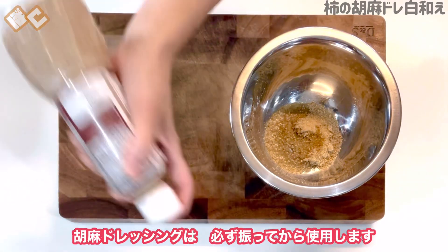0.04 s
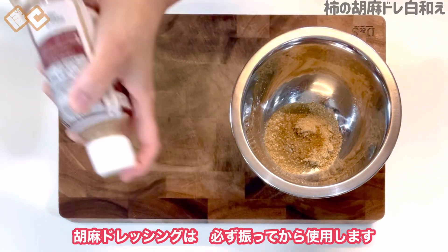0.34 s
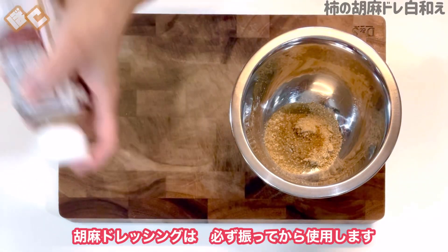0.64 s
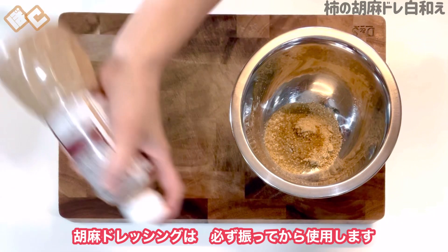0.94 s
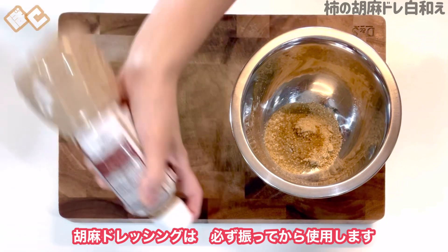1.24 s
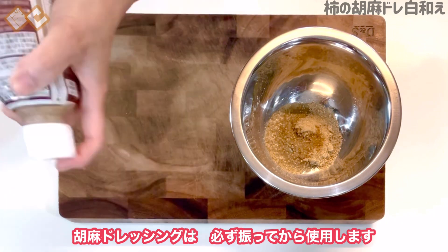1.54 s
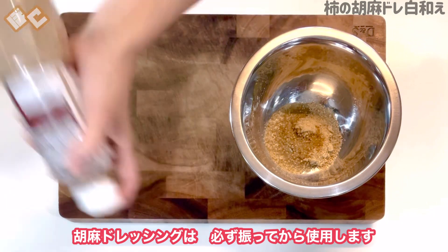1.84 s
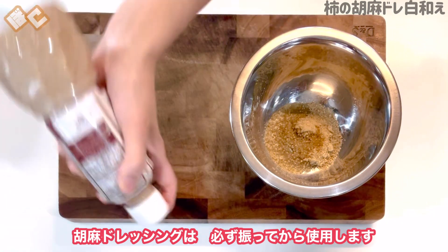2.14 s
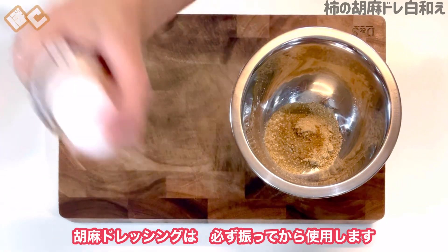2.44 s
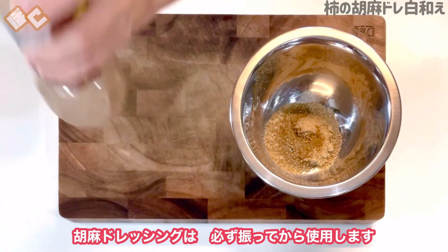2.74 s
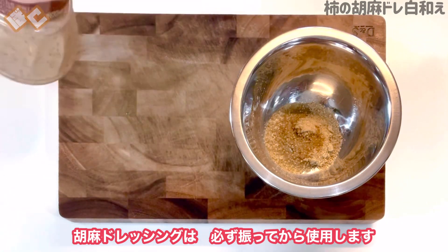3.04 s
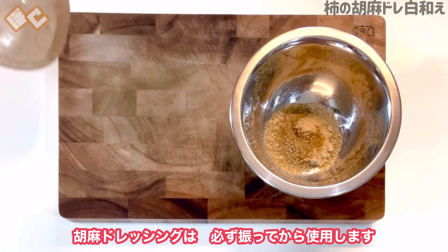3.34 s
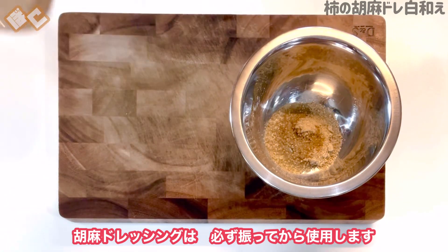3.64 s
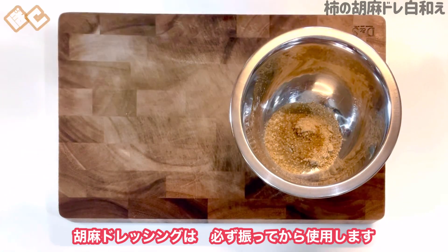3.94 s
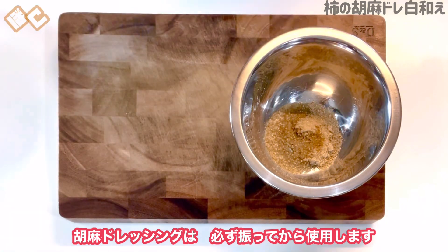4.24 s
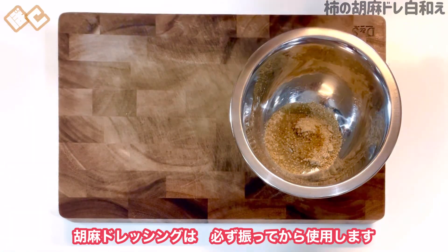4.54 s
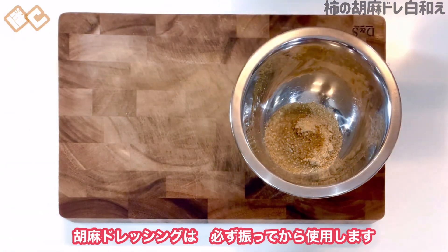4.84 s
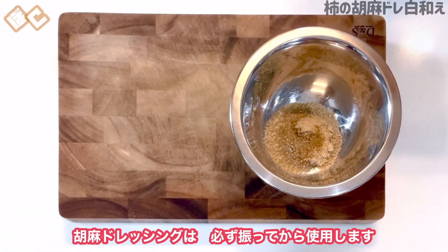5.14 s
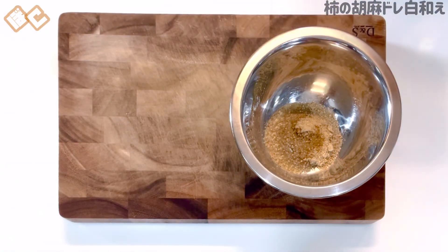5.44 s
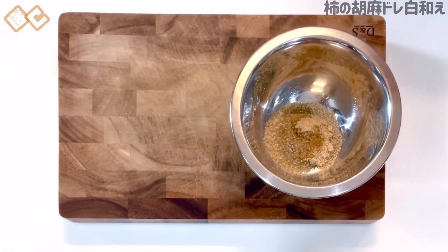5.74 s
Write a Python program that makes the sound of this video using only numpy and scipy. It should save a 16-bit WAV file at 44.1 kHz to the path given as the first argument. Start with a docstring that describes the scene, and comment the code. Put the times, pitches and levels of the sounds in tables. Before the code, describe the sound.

In a small kitchen, thick liquid sloshes quickly back and forth inside a plastic bottle, with close, hollow glugs, wet splatters and little plastic crackles. After nearly four seconds the shaking ends. The bottle knocks down on the counter, further from the microphone, and the cap opens with a sharp click. Faint finger rubs and tiny taps follow over a low appliance hum.

```python
"""A plastic bottle of thick dressing, shaken by hand over a kitchen counter, close to a stereo pair.
At about four strokes a second, air pockets gulp through the liquid, small bubbles pop, each slosh
throws spray against the wall, and the thin plastic snaps under the grip. Further off the microphones,
the bottle is set down and its cap snaps open. An appliance hums behind it all in the small room."""
import sys
import numpy as np
from scipy import signal
from scipy.fft import rfft, next_fast_len
from scipy.io import wavfile
from scipy.ndimage import uniform_filter1d

SR = 44100
rng = np.random.default_rng(int(sys.argv[2]) if len(sys.argv) > 2 else 0)


def to_wav(s):
    """Save 16-bit WAV."""
    ch = np.atleast_2d(s).T  # columns
    pcm = np.round(np.clip(ch, -1, 1) * 32767)  # PCM
    wavfile.write(sys.argv[1], SR, pcm.astype(np.int16))


N = 263718
TIME = np.arange(N) / SR

# Event levels are ahead of mix, room and microphones; spectra give shape only.
# Air pockets gulping through the liquid: start_s, level_db, pitch_hz, ring_cycles
GULPS = [(0.022, -37.5, 194, 16), (.1665, -14.5, 750, 13), (.170, -17, 217.5, 16.3), (0.283, -29, 331, 23),
         (.417, -27.5, 234, 12), (.506, -24, 734, 10.5), (0.632, -39.5, 560, 24), (.7144, -28.5, 694, 18),
         (.746, -13.5, 1003, 15.5), (.748, -33.5, 302, 18), (.868, -18.5, 950, 3.3), (.975, -34, 209, 22),
         (.988, -28.5, 540, 50), (1.14, -21, 280, 10), (1.1444, -16, 209, 14.6), (1.304, -26.5, 230, 13),
         (1.315, -24, 590, 5.7), (1.356, -30, 190, 15), (1.446, -23.5, 530, 6.3), (1.545, -26.5, 210, 9),
         (1.587, -16.5, 739, 20), (1.5916, -24, 202, 16.5), (1.69, -27.5, 196, 18.5),
         (1.784, -23, 178.6, 16), (1.805, -22.5, 229, 20), (1.8184, -17, 192, 15), (1.819, -24.5, 522, 14),
         (1.823, -31.5, 125, 14), (1.991, -29.5, 660, 6.3), (2.025, -34, 558, 60), (2.03, -23, 175, 8.3),
         (2.091, -33.5, 630, 12), (2.131, -29.5, 533, 13), (2.233, -26.5, 710, 5.7),
         (2.281, -30.5, 886, 55), (2.2816, -22.5, 193, 12), (2.31, -29.5, 1140, 13),
         (2.369, -33.5, 353, 37), (2.595, -25, 289, 15.6), (2.655, -27.5, 227, 12), (2.665, -24, 326, 24),
         (2.674, -29, 760, 42), (2.704, -26, 191, 5.9), (2.711, -36.5, 115, 21), (2.853, -19, 695, 1.7),
         (2.86, -35.5, 240, 43), (2.921, -29, 199, 16), (2.935, -32.5, 134, 19), (2.939, -18, 199, 5.3),
         (2.941, -29.5, 689, 37), (3.203, -29, 723, 25), (3.208, -31, 172, 14), (3.211, -38, 114, 16),
         (3.375, -28, 183, 11.3), (3.408, -38.5, 666, 14), (3.457, -27, 207.6, 33),
         (3.613, -37.5, 560, 6.6), (3.668, -36, 530, 13)]
# Small bubbles bursting at the wall: start_s, level_db, pitch_hz, splash_offset_db
POPS = [(0.0448, -30.5, 3770, 6), (.105, -39, 3290, 1), (.19, -41, 2640, 6.5), (0.245, -26, 1535, -0.5),
        (.267, -35, 2890, -3), (0.3332, -37, 1500, -16), (0.4121, -33, 1370, 2), (0.5041, -26, 3454, 5.5),
        (0.606, -41, 2100, 7.5), (0.746, -23, 2727, 5.5), (0.8663, -28.5, 1430, 10),
        (0.882, -36, 1220, -21), (0.969, -33, 1370, -23), (1.0005, -25, 1510, -22),
        (1.1374, -35, 1840, 12.5), (1.2127, -31.5, 2800, 8), (1.2223, -34, 4130, 8.5),
        (1.245, -35.5, 2510, 7.5), (1.3458, -24, 3410, 5), (1.352, -25, 3000, 1.5),
        (1.4248, -33.5, 3660, 10), (1.4477, -38, 2340, 18), (1.4628, -38.5, 1890, 10),
        (1.542, -40.5, 2260, 14.5), (1.6756, -30, 1750, 12.5), (1.6887, -28, 3660, -22),
        (1.8111, -28.5, 1220, -7), (1.8196, -31.5, 2000, 11), (1.892, -23.5, 3100, -6),
        (2.0272, -24.5, 1670, 11.5), (2.0671, -29, 2980, -12), (2.1581, -36.5, 1480, 9),
        (2.1824, -32, 2860, 7), (2.3678, -25.5, 3850, 1.5), (2.3919, -32, 4360, 8),
        (2.7048, -38, 1990, 15.5), (2.8603, -20.5, 4410, -1.5), (2.93, -28, 1375, 6.5),
        (2.9391, -23, 4890, -4.5), (2.9522, -25.5, 2850, -1.5), (3.0581, -44, 1480, 17.5),
        (3.1792, -31, 3220, 3.5), (3.201, -27.5, 1380, -1.5), (3.372, -27, 3720, -20),
        (3.4658, -28.5, 1830, 1), (3.4918, -28, 1780, 4.5), (3.5221, -30.5, 4820, 1.5),
        (3.672, -42, 1410, -3), (3.754, -31, 1245, 9)]
# Liquid landing at one end of the bottle: crest_s, level_db, drain_s
SLOSHES = [(0.024, -45, 0.043), (0.276, -32.5, 0.011), (0.364, -42, 0.0078), (0.51, -37.5, .009),
           (0.646, -48.5, 0.042), (0.746, -40.5, 0.017), (0.873, -37.5, 0.016), (0.992, -32, 0.022),
           (1.12, -41.5, 0.038), (1.225, -35.5, .022), (1.353, -40.5, 0.033), (1.459, -36.5, 0.025),
           (1.597, -43, 0.026), (1.686, -33, 0.018), (1.791, -35.5, 0.032), (1.816, -27.5, 0.0075),
           (1.885, -43.5, 0.049), (2.029, -37, .016), (2.278, -38.5, 0.041), (2.37, -34.5, 0.0057),
           (2.698, -30.5, 0.015), (2.858, -38.5, 0.01), (2.933, -44, 0.051), (3.07, -47.5, 0.06),
           (3.205, -34.5, 0.018), (3.373, -37.5, 0.013), (3.453, -42.5, .018), (3.486, -30.5, 0.015),
           (3.676, -47, 0.027), (3.769, -49.5, 0.047)]
# Spectrum of fine bubbles and ticks: frequency_hz, level_db
FINE_SPECTRUM = [(400, -2.5), (900, 3), (1600, 3), (3000, 5), (5000, 1.5), (7000, -1.5), (11000, -9.5),
                 (13000, -23.5), (16000, -24.5)]
# Spectrum of coarse bubbles: frequency_hz, level_db
COARSE_SPECTRUM = [(60, -13.5), (130, -1.5), (250, 7.5), (450, -7.5), (800, -1.5), (1400, -15.5),
                   (3000, -46)]
# Spectrum of stirring foam: frequency_hz, level_db
FOAM_SPECTRUM = [(350, -4), (600, -17), (1500, -5.5), (3000, -3), (5000, -14.5), (7000, -6), (12000, -26.5)]
# Spectrum of droplets on the wall: frequency_hz, level_db
SPATTER_SPECTRUM = [(500, -15.5), (1500, -4.5), (4500, -5), (7000, 4.5), (11000, -2.5), (13000, -10.5),
                    (16000, -12)]

# The thin wall snapping under the grip: start_s, level_db, t60_s
WALL_SNAPS = [(0.164, -38, 0.017), (0.6463, -35.5, 0.011), (0.7414, -34.5, 0.014), (0.8654, -43.5, 0.0083),
              (1.0222, -40.5, 0.0081), (1.2118, -35, 0.0094), (1.3445, -47.5, 0.011), (1.6768, -30, 0.0084),
              (1.8906, -36, 0.0049), (2.0278, -34, 0.014), (2.103, -47, 0.014), (2.1833, -41, 0.0078),
              (2.354, -44, 0.017), (2.5704, -40, 0.011), (2.7817, -25, 0.0069), (2.918, -42.5, 0.015),
              (3.0809, -29.5, 0.017), (3.3535, -39, 0.012), (3.5227, -32.5, 0.014), (3.682, -41.5, 0.0087)]
# Spectrum of the flexing wall: frequency_hz, level_db
SNAP_SPECTRUM = [(500, -22), (2000, -10.5), (4500, -2.5), (7000, 8.5), (9500, -6.5), (12000, -11),
                 (13500, -9), (16000, -16)]
# The bottle landing and its cap opening: start_s, crack_db, crack_t60_s, body_db
KNOCKS = [(4.2538, -38, 0.019, -33.5), (4.2572, -64, 0.036, -44), (4.269, -51, .037, -43.5),
          (4.507, -47, 0.014, -85), (4.553, -52, .073, -72), (4.9356, -27, 0.018, -65),
          (4.943, -33.5, 0.0097, -57), (4.952, -40, 0.1, -71), (5.061, -76.5, .05, -57.5)]
# Modes of the full bottle standing on the counter: pitch_hz, level_db, t60_s
BOTTLE_MODES = [(342, -17, 0.038), (438.5, -2.5, 0.13), (478, -2.5, 0.036), (706, -16, 0.014),
                (995, -4.5, 0.026), (1820, 4.5, 0.016), (2060, -10.5, 0.022), (2320, 4.5, 0.025),
                (3700, -3, 0.028), (5340, 2, 0.0096)]
# Spectrum of struck plastic: frequency_hz, level_db
CRACK_SPECTRUM = [(200, -34), (900, -25), (1600, 0.5), (3500, -1), (5500, -2.5), (8000, 1.5), (11000, 7),
                  (13000, -0.5), (16000, 3.5)]
# Spectrum of the counter's thud: frequency_hz, level_db
THUD_SPECTRUM = [(120, -26), (300, -27), (450, 2), (800, -2), (1300, -7.5), (2300, -12), (6000, -4),
                 (16000, -66)]
# Small things touching the counter: start_s, level_db, pitch_hz, t60_s
TAPS = [(5.058, -54, 1890, 0.043), (5.577, -54.5, 2400, 0.045), (5.619, -47.5, 338, 0.056)]
# Fingers sliding on the plastic: crest_s, level_db, width_s
RUBS = [(3.894, -66.5, 0.063), (4.119, -72, 0.037), (4.541, -66, 0.011), (4.609, -72, 0.19),
        (4.856, -65.5, 0.034), (5.04, -62, 0.062), (5.439, -75.5, 0.038), (5.62, -73.5, .05),
        (5.808, -72.5, 0.023)]
# Spectrum of rubbing skin: frequency_hz, level_db
SKIN_SPECTRUM = [(300, 13), (900, -2), (1700, -1), (3800, -4), (5500, -5.5), (8000, -10), (11000, 0),
                 (13000, -11), (16000, -31.5)]

# Tones of the appliance: pitch_hz, level_db
HUM_TONES = [(44.4, -59), (70, -71.5), (133.6, -59), (265, -75), (357, -81.5), (399, -77.5), (445, -75.5)]
# Spectrum of the kitchen's still air: frequency_hz, level_db
AIR_SPECTRUM = [(15, -34), (30, -33), (42, 5.5), (55, -1.5), (95, -8), (135, -11), (210, -18.5),
                (280, -16.5), (440, -29.5), (700, -31.5), (1000, -43), (3000, -51), (7000, -52),
                (16000, -47)]
# Hum and air grow a little louder near the end: time_s, gain_db
BACKGROUND_SWELL = [(0, 0), (3.9, 0), (4.6, -0.5), (4.9, 1.5), (5.3, 3.5), (5.98, 3)]
# Reflections off small surfaces nearby, with little bass: frequency_hz, level_db
NEAR_SPECTRUM = [(60, -16.5), (200, -17), (450, 9.5), (1500, 1), (4500, -1.5), (7000, -3), (16000, -11)]
# Decay of the kitchen: frequency_hz, t60_s
KITCHEN_T60 = [(150, 0.36), (400, 0.47), (1000, 0.36), (2800, 0.3), (7300, 0.23), (15000, 0.037)]
# Phase between the microphones: frequency_hz, left_lead_rad
MIC_PHASE = [(20, 0), (1000, .05), (1600, -.2), (5200, -.1), (6200, 2.9), (7200, 3.2), (8300, 4),
             (9900, 6.2), (11300, 6.4), (12900, 9.3), (16000, 9.6)]
# Balance between the microphones: frequency_hz, left_minus_right_db
MIC_BALANCE = [(60, 3.5), (200, 2.5), (700, 0), (2400, 0), (4400, -5), (8000, -2), (15000, 1.5)]

SHED_S = 0.018  # time over which a gulp sheds bubbles


def gulps(steady_hz=282, steady_cycles=5.4, max_rise_octaves=0.79):
    """Big air pockets, damped by the thick liquid: deep ones sink in pitch, small long ones rise."""
    out = np.zeros(N)
    for start, db, hz, cycles in GULPS:
        glide_by_size = 1.3 * np.log2(hz / steady_hz)
        glide_by_length = 0.014 * (cycles - steady_cycles)
        glide = min(glide_by_size, glide_by_length, max_rise_octaves)
        add(out, start, amp(db) * bubble(hz, cycles / hz, glide, attack_cycles=0.64))
    return out


def pops(splash_t60=0.029, splash_rise_s=0.0002, tick_t60=0.0063):
    """A small bubble bursts with a tick and rings; its torn film splashes in a band round that pitch."""
    out, t = np.zeros(N), np.arange(2048) / SR
    for start, db, hz, splash_db in POPS:
        splash_noise, tick_noise = rng.standard_normal((2, len(t)))
        band = [(hz / 8, -17), (hz / 1.5, -6), (hz, 0), (hz * 1.4, -6), (hz * 2.6, -19), (hz * 9, -35)]
        splash = unit(colour(splash_noise, band) * clumps(len(t), depth_db=4, clump_s=0.0012))
        splash *= fade(t, splash_t60) * (1 - np.exp(-t / splash_rise_s))
        tick = colour(tick_noise, FINE_SPECTRUM) * fade(t, tick_t60)
        ring_t60 = 0.013 * np.sqrt(2000 / hz)  # smaller bubbles die sooner
        add(out, start, amp(db) * bubble(hz, ring_t60, glide_octaves=0.21, attack_cycles=2.5))
        add(out, start, amp(db) * (amp(splash_db - 5) * splash + amp(-12) * tick))
    return out


def spray(rise_share=0.41, ticks_per_s=2500):
    """Each slosh swells and drains as a cloud of fine and coarse bubbles; foam keeps stirring between."""
    slosh_power = sum(swell(crest, db, rise_share * drain, drain) for crest, db, drain in SLOSHES)
    shed_power = sum(swell(start + SHED_S / 2, db - 22, rise_share * SHED_S, SHED_S)
                     for start, db, _, _ in GULPS)
    foam_power = foam_settling()
    bunches = clumps(N, depth_db=5, clump_s=0.002)
    bubbles = cloud(700, 6000, per_s=1300, cycles=18, spread_db=4.5)
    ticks = rng.standard_normal(N) * (rng.random(N) < ticks_per_s / SR)
    fine = colour(bubbles + 0.5 * unit(ticks * bunches), FINE_SPECTRUM)
    coarse = colour(cloud(110, 1300, per_s=800, cycles=10, spread_db=2.5), COARSE_SPECTRUM)
    foam = colour(cloud(420, 7000, per_s=900, cycles=26, spread_db=4), FOAM_SPECTRUM)
    # Lone bubbles rising through the foam, middle-sized and small.
    gurgles = cloud(510, 1600, per_s=100, cycles=20, spread_db=2, sizes=14)
    plips = cloud(1200, 4500, per_s=110, cycles=32, spread_db=3, sizes=16)
    thrown = amp(-3) * fine + amp(-10) * (gurgles + plips) + amp(-12.5) * spatter()
    froth = amp(-7) * foam + amp(-6) * gurgles + amp(-5.5) * plips
    coarse_power = amp(-3) ** 2 * slosh_power + shed_power + amp(-7) ** 2 * foam_power
    return np.sqrt(slosh_power) * thrown + np.sqrt(foam_power) * froth + np.sqrt(coarse_power) * coarse


def spatter(per_s=330, spread_db=2):
    """Single droplets tick crisply on the thin wall; a few hit harder than the rest."""
    strength = rng.choice([-1, 1], N) * amp(spread_db * np.minimum(rng.exponential(1, N), 3))
    return colour(strength * (rng.random(N) < per_s / SR), SPATTER_SPECTRUM)


def foam_settling(foam_t60=0.27, film_drain_s=0.18):
    """Power of the foam left by sloshes and gulps, and of the thin film draining down the wall."""
    settle_s = foam_t60 / np.log(1000)
    slosh_foam = sum(swell(crest, db - 15, drain, settle_s) for crest, db, drain in SLOSHES)
    film = sum(swell(crest, db - 25, drain, film_drain_s) for crest, db, drain in SLOSHES)
    gulp_foam = sum(swell(start, db - 31, SHED_S, settle_s) for start, db, _, _ in GULPS)
    return slosh_foam + film + gulp_foam


def bubble(hz, t60, glide_octaves, attack_cycles):
    """A ringing pocket of air; its pitch slides as the liquid squeezes it."""
    t = np.arange(int(1.3 * max(t60, 1e-3) * SR)) / SR
    turns = np.cumsum(hz * 2 ** (glide_octaves * np.minimum(t / t60, 1))) / SR
    envelope = (1 - np.exp(-t * hz / attack_cycles)) * fade(t, t60)
    return np.sin(2 * np.pi * turns) * envelope / envelope.max()


def cloud(low_hz, high_hz, per_s, cycles, spread_db, sizes=36):
    """Bubbles of many sizes ringing at random times, a few stronger than the rest; rms 1."""
    out = np.zeros(N)
    for hz in np.geomspace(low_hz, high_hz, sizes):
        t60 = cycles * rng.uniform(0.5, 1.5) / hz
        ring = bubble(hz, t60, glide_octaves=rng.uniform(-0.3, 0.4), attack_cycles=0.6)
        strength = amp(spread_db * np.minimum(rng.exponential(1, N), 3))
        births = rng.random(N) < per_s / sizes / SR
        out += signal.oaconvolve(strength * births, ring / np.linalg.norm(ring))[:N]
    return unit(out)


def clumps(samples, depth_db, clump_s):
    """A gain that jumps about, because drops land in little bunches."""
    knots = np.cumsum(rng.exponential(clump_s, int(2 * samples / SR / clump_s) + 8))
    jumps = np.clip(rng.standard_normal(len(knots)), -2, 2)
    return unit(amp(depth_db * np.interp(np.arange(samples) / SR, knots, jumps)))


def wall_snaps():
    """Dry ticks of the bottle wall flexing under the grip."""
    out, t = np.zeros(N), np.arange(1024) / SR
    for start, db, t60 in WALL_SNAPS:
        add(out, start, amp(db + 4) * colour(rng.standard_normal(len(t)), SNAP_SPECTRUM) * fade(t, t60))
    return out


def knocks(blur=0.6, thud_t60=0.028):
    """Plastic cracks, the counter thuds and the bottle rings, its modes blurred by the liquid inside."""
    out, t = np.zeros(N), np.arange(SR // 4) / SR
    for start, crack_db, crack_t60, body_db in KNOCKS:
        crack = colour(rng.standard_normal(len(t)), CRACK_SPECTRUM) * fade(t, crack_t60)
        thud = colour(rng.standard_normal(len(t)), THUD_SPECTRUM) * fade(t, thud_t60)
        body = amp(-3) * thud
        for hz, db, t60 in BOTTLE_MODES:
            drift = blur * np.sqrt(hz / SR) * np.cumsum(rng.standard_normal(len(t)))
            body += amp(db) * np.sin(2 * np.pi * hz * t + drift) * fade(t, t60)
        add(out, start, amp(crack_db) * crack + amp(body_db - 6) * body)
    return out


def counter_taps():
    """Small things touch the counter, each ringing briefly at one pitch."""
    out, t = np.zeros(N), np.arange(SR // 4) / SR
    for start, db, hz, t60 in TAPS:
        add(out, start, amp(db) * np.sin(2 * np.pi * hz * t) * fade(t, t60))
    return out


def finger_rubs(uneven_db=3):
    """Skin sticks and slips on the plastic in short swells of uneven hiss."""
    grip = amp(uneven_db * unit(uniform_filter1d(rng.standard_normal(N), size=300)))
    slides = sum(amp(db) * np.exp(-0.5 * ((TIME - crest) / width) ** 2) for crest, db, width in RUBS)
    return slides * unit(grip * colour(rng.standard_normal(N), SKIN_SPECTRUM))


def appliance_hum(waver_rad=0.23):
    """A low hum in the background, each tone wavering on its own."""
    out, knots = np.zeros(N), np.linspace(0, TIME[-1], 40)
    for hz, db in HUM_TONES:
        waver = waver_rad * np.interp(TIME, knots, rng.standard_normal(len(knots)))
        out += amp(db) * np.sqrt(2) * np.sin(2 * np.pi * hz * TIME + waver)
    return out


def kitchen_air():
    """Room tone: a faint rumble, mostly the same at both microphones."""
    shared, left, right = (colour(noise, AIR_SPECTRUM) for noise in rng.standard_normal((3, N)))
    return amp(-58) * (shared + amp(-9) * np.array([left, right]))


def near_reflections(t, t60=0.037, alike_below_hz=300):
    """Quick, sparse echoes off counter and bowl; long waves reach both microphones alike."""
    noise = rng.standard_normal((2, len(t)))
    arrivals = noise * (abs(noise) > 1.6) * (t > 0.002)
    near = np.array([colour(side, NEAR_SPECTRUM) for side in arrivals]) * fade(t, t60)
    lowpass = signal.butter(2, alike_below_hz, fs=SR, output="sos")
    near -= signal.sosfiltfilt(lowpass, near - near.mean(0))
    return near / np.linalg.norm(near[0])


def kitchen_tail(t, build_s=0.0017, alike_below_hz=600):
    """The small room's short, diffuse tail; the treble dies first."""
    hz, frame_s, (left, apart) = signal.stft(rng.standard_normal((2, len(t))), SR, nperseg=256)
    coherence = np.exp(-(hz / alike_below_hz) ** 2)[:, None]
    right = coherence * left + np.sqrt(1 - coherence ** 2) * apart
    decay = np.exp(-np.log(1000) * frame_s / at_hz(KITCHEN_T60, hz)[:, None])
    tail = signal.istft(np.array([left, right]) * decay, SR, nperseg=256)[1][:, :len(t)]
    tail *= 1 - np.exp(-t / build_s)
    return tail / np.linalg.norm(tail[0])


def room(direct, near_db, tail_db, responses=4, changes_per_s=9):
    """Direct sound plus echoes; the bottle moves, so they keep passing from one response to the next."""
    out, t = np.array([direct, direct]), np.arange(SR // 2) / SR
    for k in range(responses):
        steps_away = abs((TIME * changes_per_s - k) % responses - responses / 2)
        share = np.sin(np.pi / 2 * np.maximum(1 - steps_away, 0))
        echoes = amp(near_db) * near_reflections(t) + amp(tail_db) * kitchen_tail(t)
        out += signal.oaconvolve((direct * share)[None], echoes, axes=1)[:, :N]
    return out


def amp(db):
    """Decibels to gain."""
    return 10 ** (np.asarray(db) / 20)


def unit(x):
    """Scales to rms 1."""
    return x / np.sqrt(np.mean(x ** 2) + 1e-20)


def at_hz(table, hz):
    """Reads a table along a log-frequency axis."""
    table_hz, values = np.transpose(table)
    return np.interp(np.log(hz + 1), np.log(table_hz + 1), values)


def colour(x, spectrum):
    """Filters by a spectrum table; rms 1."""
    size = next_fast_len(len(x))
    gain = amp(at_hz(spectrum, np.fft.rfftfreq(size, 1 / SR)))
    return unit(np.fft.irfft(rfft(x, size) * gain, size)[:len(x)])


def add(mix, start_s, sound):
    """Mixes a sound in at start_s."""
    part = mix[max(round(start_s * SR), 0):][:len(sound)]
    part += sound[:len(part)]


def fade(t, t60):
    """Falls 60 dB in t60 seconds."""
    return np.exp(-np.log(1000) * t / max(t60, 1e-3))


def swell(crest_s, db, rise_s, drain_s):
    """Power that builds to a crest and drains away exponentially."""
    time_constants = np.maximum((TIME - crest_s) / drain_s, (crest_s - TIME) / rise_s)
    return amp(db) ** 2 * np.exp(-2 * np.minimum(time_constants, 20))


def scene():
    """The shaking is close to the microphones; the bottle is put down further off, with more room."""
    liquid = room(gulps() + pops() + spray(), near_db=-8, tail_db=-13)
    wall = room(wall_snaps(), near_db=-12, tail_db=-18)
    handling = room(knocks() + counter_taps() + finger_rubs(), near_db=-1.5, tail_db=-3)
    background_gain = amp(np.interp(TIME, *np.transpose(BACKGROUND_SWELL)))
    return liquid + wall + amp(-2) * handling + background_gain * (appliance_hum() + kitchen_air())


def record(dry):
    """The stereo pair: the two microphones differ in phase and level; the band ends at 16.1 kHz."""
    size = next_fast_len(N + SR // 10)
    hz = np.fft.rfftfreq(size, 1 / SR)
    left_response = amp(at_hz(MIC_BALANCE, hz) / 2) * np.exp(0.5j * at_hz(MIC_PHASE, hz))
    pair = np.fft.irfft(rfft(dry, size) * np.array([left_response, 1 / left_response]), size)[:, :N]
    lowpass = signal.firwin(511, 16100, window=("kaiser", 9), fs=SR)
    return signal.oaconvolve(pair, lowpass[None], "same")


dry = scene()
out = record(dry)
to_wav(out)
```